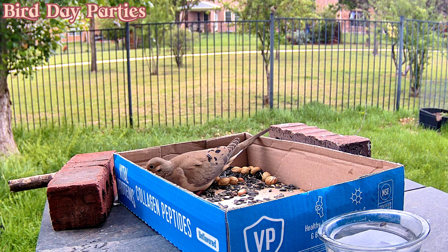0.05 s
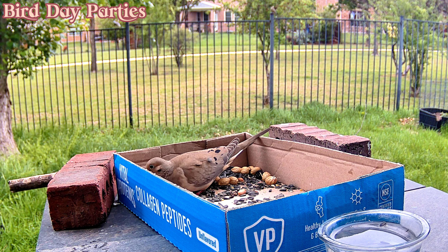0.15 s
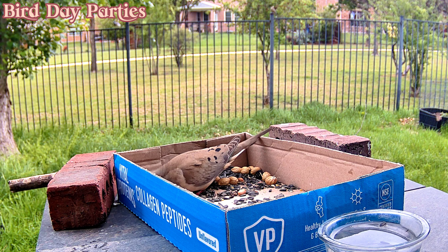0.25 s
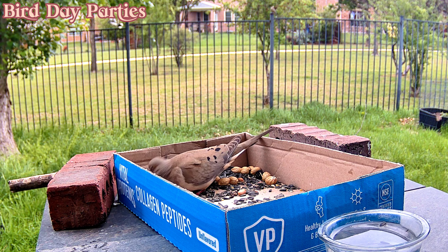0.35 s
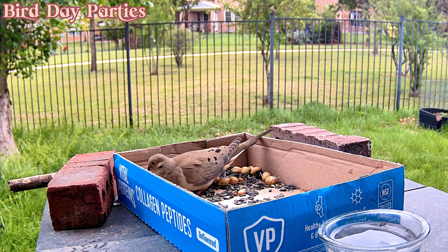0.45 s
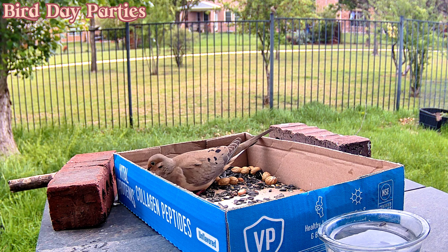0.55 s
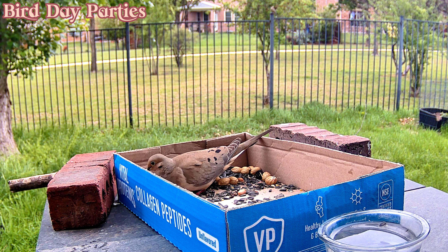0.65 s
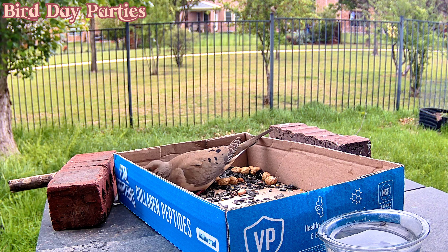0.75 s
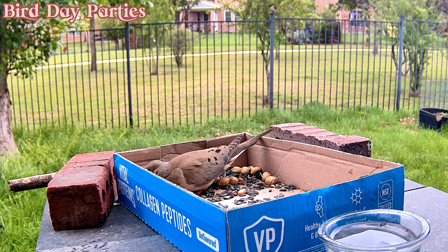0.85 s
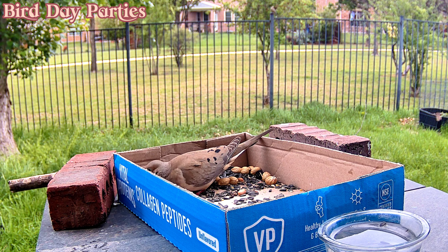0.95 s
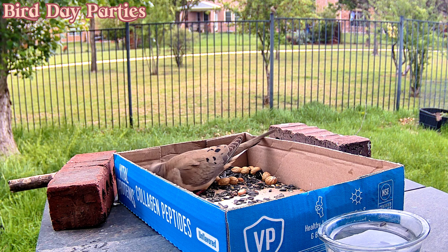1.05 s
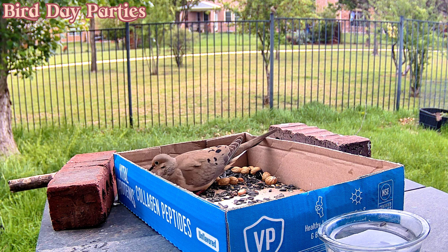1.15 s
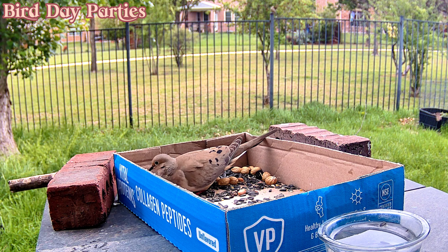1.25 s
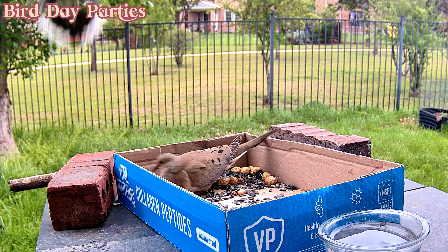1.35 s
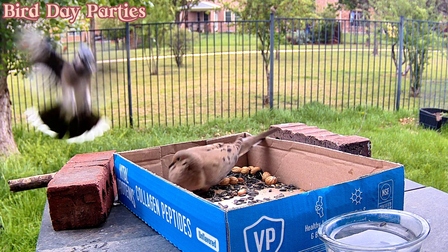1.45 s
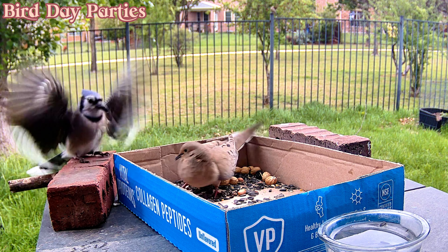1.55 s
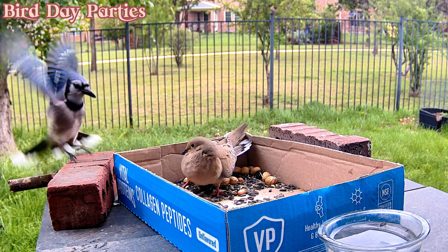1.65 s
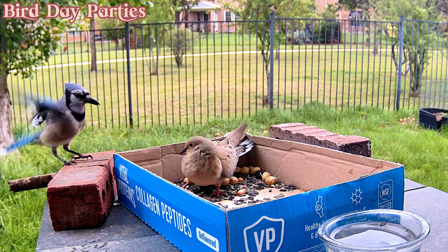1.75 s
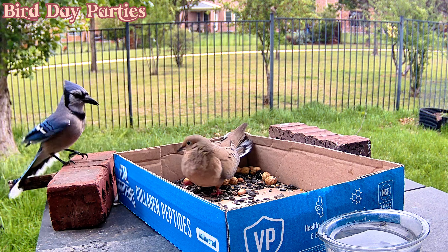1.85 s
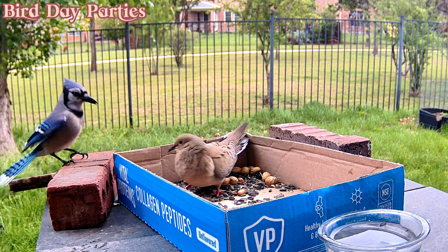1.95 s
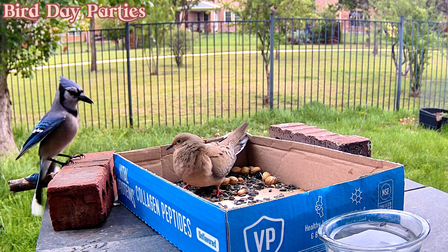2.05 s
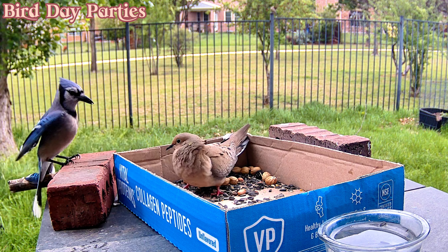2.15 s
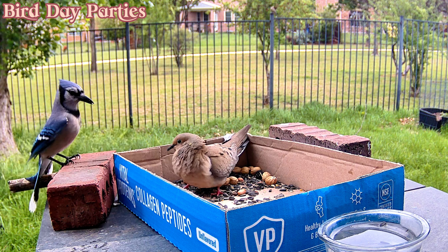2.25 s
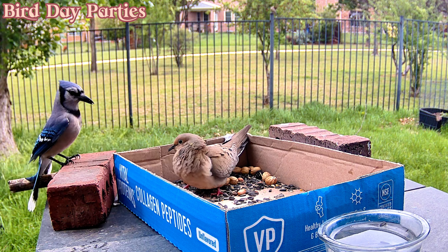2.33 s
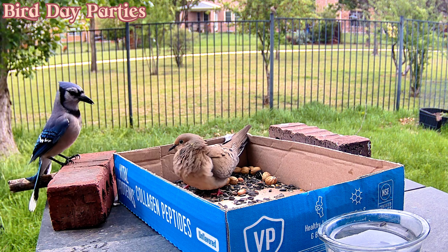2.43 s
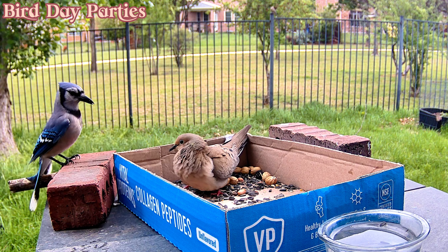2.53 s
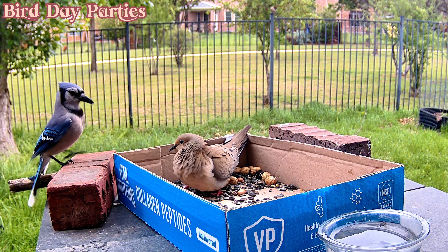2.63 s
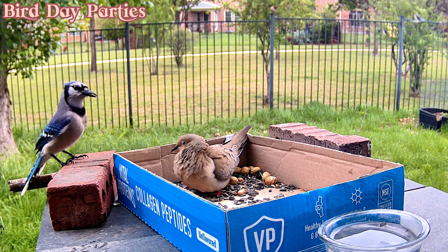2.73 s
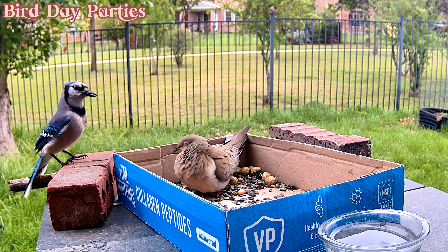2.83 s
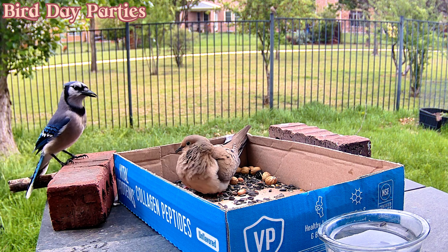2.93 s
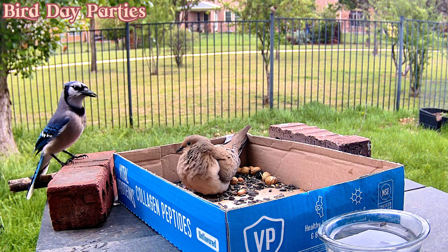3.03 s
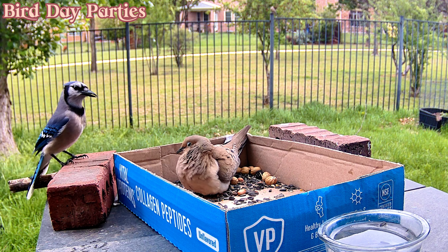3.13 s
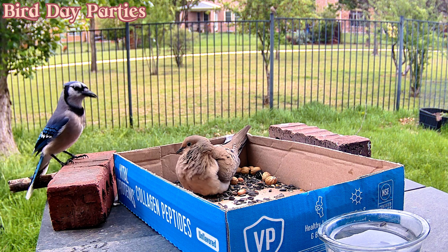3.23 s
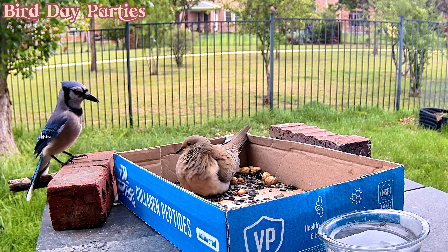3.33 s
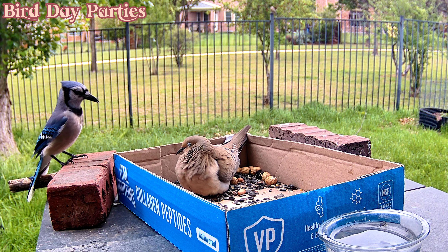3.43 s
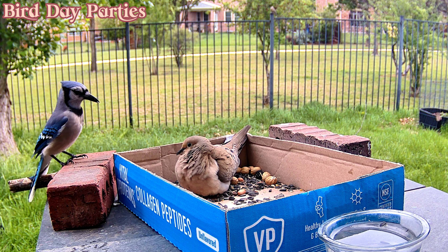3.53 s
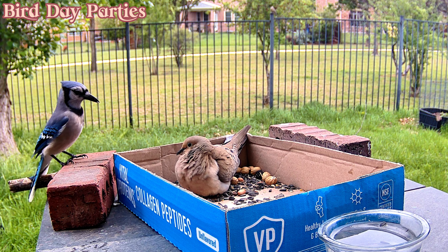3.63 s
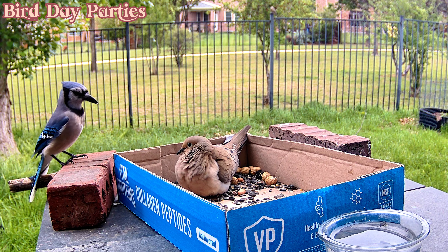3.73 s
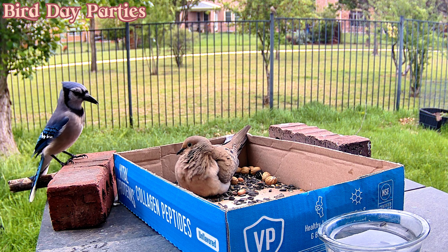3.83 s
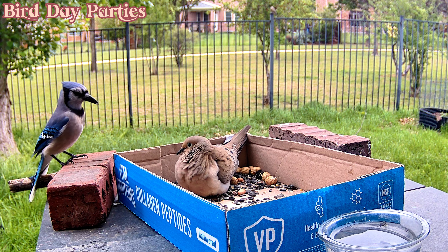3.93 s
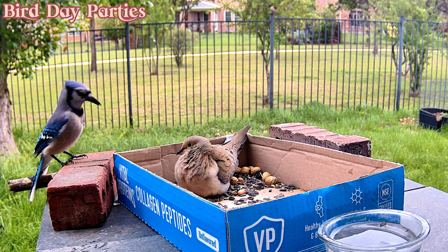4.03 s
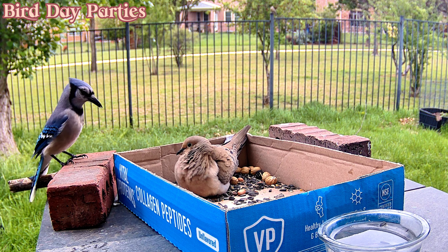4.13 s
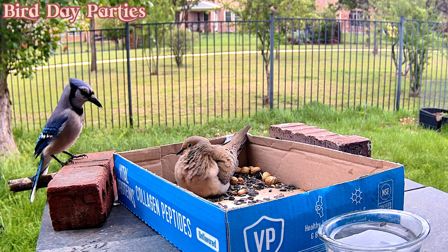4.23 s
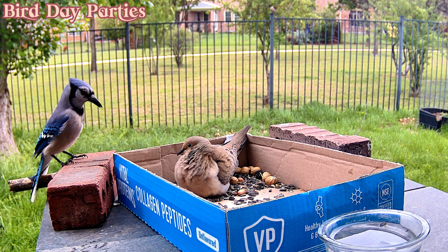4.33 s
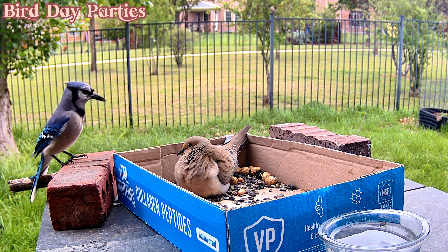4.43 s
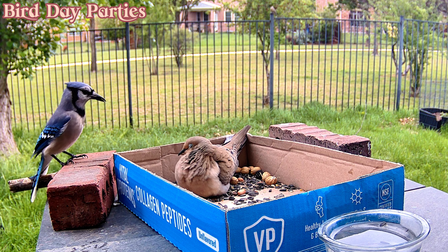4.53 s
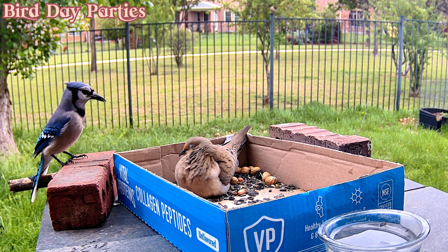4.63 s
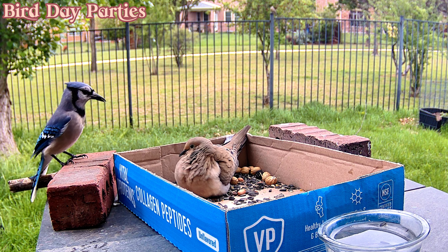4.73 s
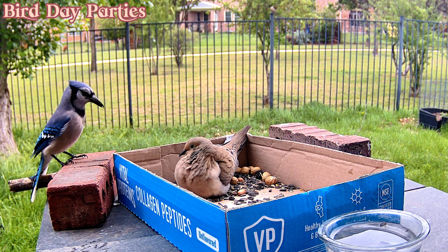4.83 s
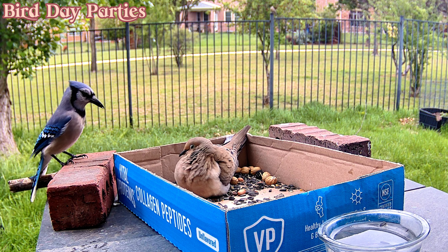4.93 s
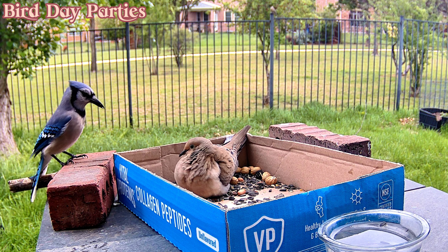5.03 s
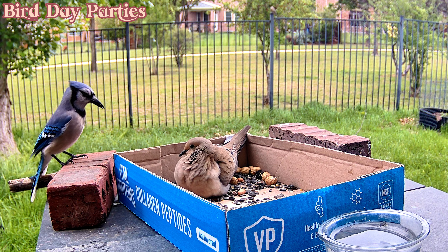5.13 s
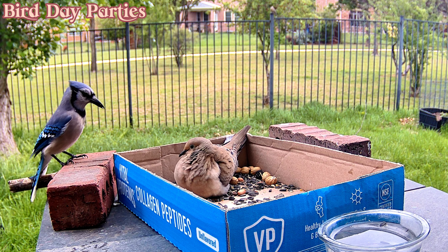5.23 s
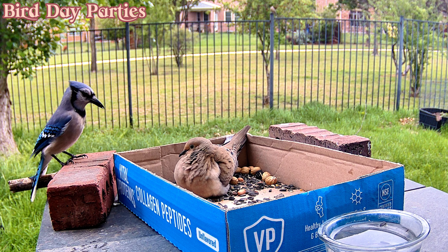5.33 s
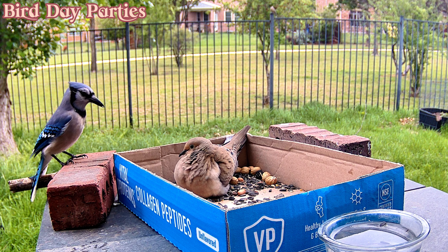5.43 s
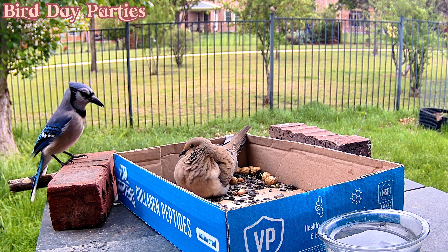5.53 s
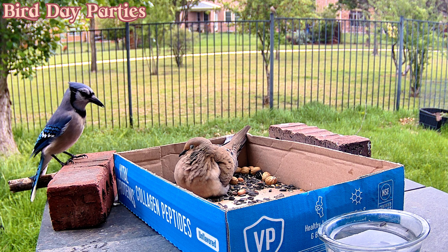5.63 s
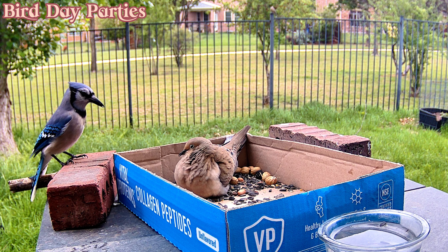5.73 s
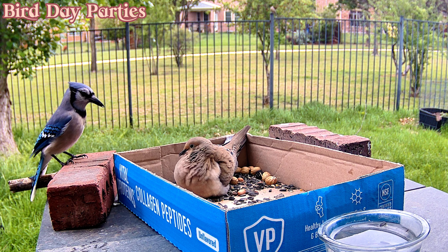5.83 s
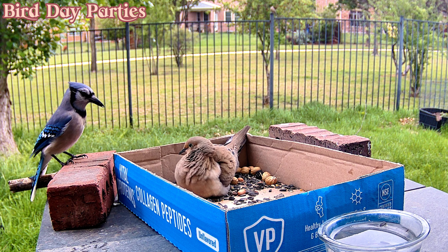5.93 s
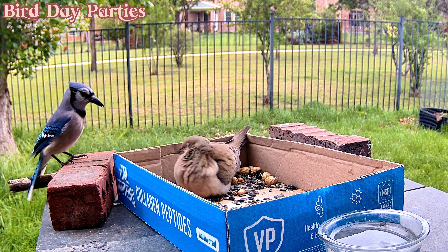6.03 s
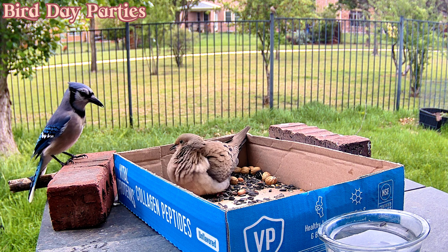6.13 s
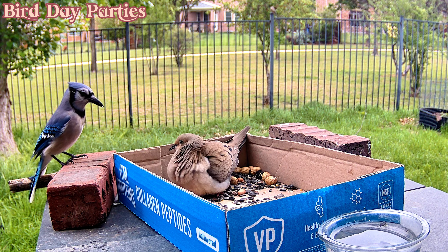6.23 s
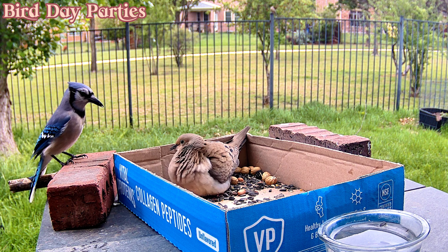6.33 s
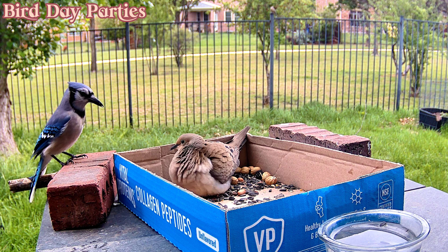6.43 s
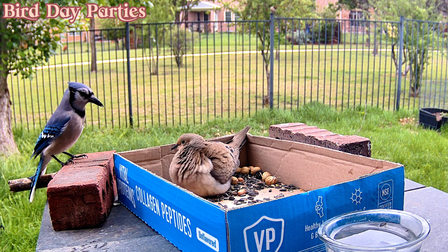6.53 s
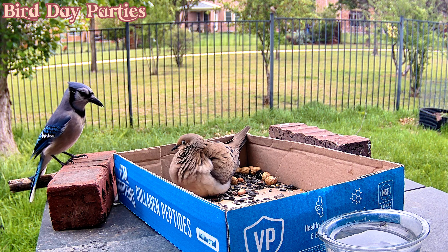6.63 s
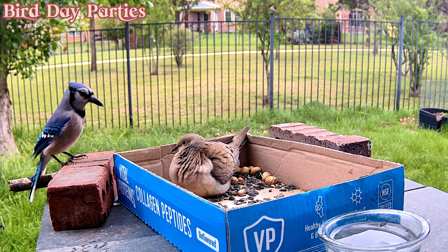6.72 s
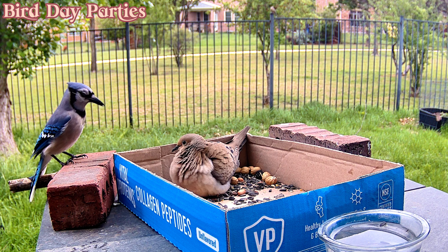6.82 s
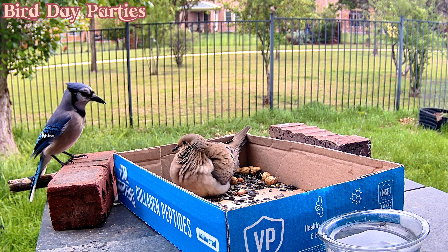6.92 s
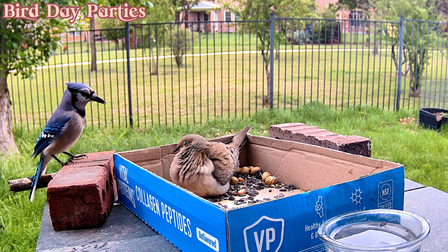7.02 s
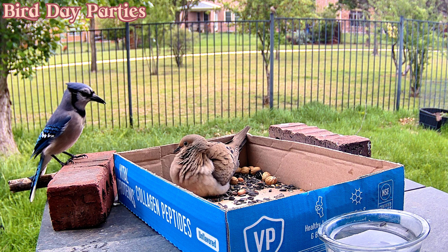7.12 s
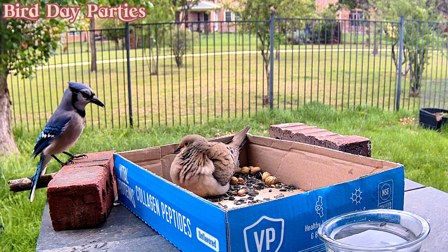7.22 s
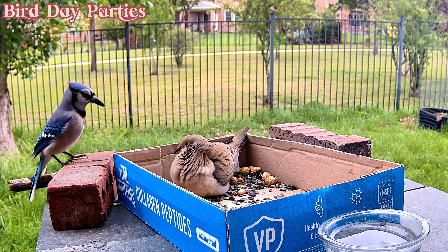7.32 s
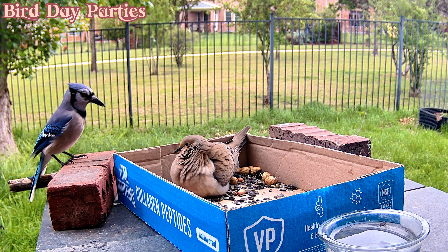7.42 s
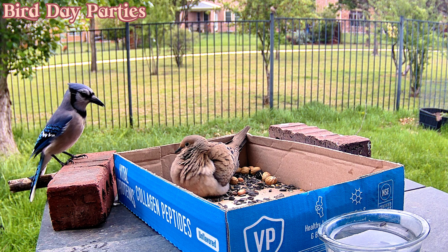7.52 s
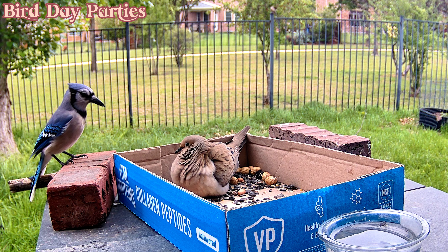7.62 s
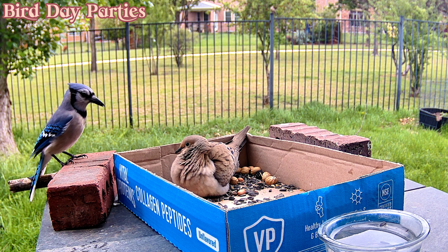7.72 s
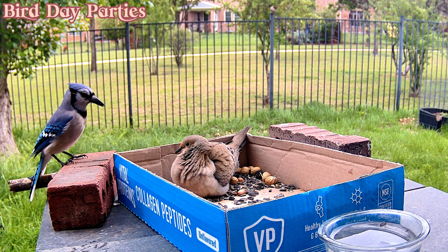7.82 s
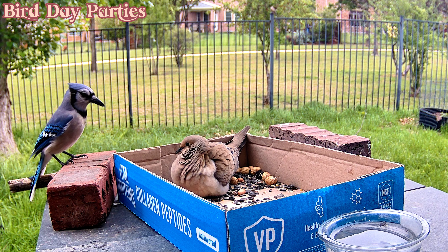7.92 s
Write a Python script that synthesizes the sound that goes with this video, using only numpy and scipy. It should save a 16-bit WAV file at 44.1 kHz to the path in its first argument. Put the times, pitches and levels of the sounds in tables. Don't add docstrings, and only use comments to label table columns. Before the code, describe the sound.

A backyard with soft traffic and leaf wash, steady thin crickets and a katydid pulsing about ten times a second in runs. Low wind eddies bump the microphone, strongest around 2 to 4 s; the treble is limited and briefly drops out. At 0 s a scratch tails off with light pecks and two throbbing bird notes. From 0.4 to 0.65 s a hard burst of pecks knocks the hollow cardboard and seeds slide; another follows at 1.15 to 1.45 s. Around 1.5 to 2.15 s claws scramble, with one sharp knock and dull booms near 1.7 s. The tray then quiets. Far pips sound at 2.1 to 2.6 s, husky sparrow chirps from 3 to 5 s and later, among faint high whistles. At 5.95 s the dove gives a short, low, gurgling grunt and shuffles. Falling songbird slurs with held pulses echo at 5.8, 6.5, 7.2 and 7.8 s.

```python
import sys
import numpy as np
from scipy import signal
from scipy.fft import rfft, irfft, next_fast_len
from scipy.io import wavfile
from scipy.ndimage import uniform_filter1d

SR = 44100
rng = np.random.default_rng(int(sys.argv[2]) if len(sys.argv) > 2 else 0)


def level_to_linear(level):
    exponent = np.asarray(level, float) / 20
    return 10 ** exponent


def pcm_store(signal):
    levels = np.round(np.clip(np.atleast_2d(signal), -1, 1) * 32767)
    wavfile.write(sys.argv[1], SR, levels.astype(np.int16).T)


N = 351477

# frequency in Hz, density in dB per Hz.
AIR_SPECTRUM = [(59, -30.5), (100, -24.5), (220, -16.5), (540, -20.5), (982, -23.5), (1460, -28),
                (1600, -27.5), (2860, -28), (3710, -32.5), (4160, -32), (4560, -29), (5300, -36),
                (7290, -30.5), (8790, -56), (11400, -83), (19300, -120)]
# time in seconds, level in dB.
LEAVES = [(0, 5), (1.1, 5), (2.4, 2.5), (3.001, 1.5), (5.999, 1.86), (7.97, 2)]
# centre in Hz, width in Hz, level in dB.
HUMS = [(1450, 46, -77), (975, 32, -76)]
# time in seconds, push in dB.
WIND_PUSH = [(0.0, -32), (0.8, -35.5), (1.9, -35), (2.4, -38.5), (2.8, -37), (3.77, -40), (3.97, -35),
             (4.3, -40), (4.9, -33), (5.3, -37.5), (7.3, -49.5), (7.97, -65)]
# time in seconds, level in dB.
FLUTTER = [(0, -51), (7.2, -55), (7.97, -49.5)]
# peak time in seconds, peak in dB, frequency in Hz.
PULLS = [(0.207, -21, 66.6), (0.261, -40, 44), (.29, -40, 55.6), (0.426, -29, 62), (0.696, -32.5, 59.3),
         (.98, -33, 45.3), (1.019, -30, 39), (1.405, -32, 64.5), (1.759, -22, 61), (1.931, -26, 49),
         (1.963, -16.5, 64), (1.998, -21, 61.6), (2.101, -29.5, 45.6), (2.441, -28, 50.3),
         (2.741, -10, 64.2), (2.872, -27, 59.6), (3.031, -33, 45.9), (3.9, -28.5, 49.8),
         (3.93, -18.5, 60.2), (3.979, -27, 55), (4.396, -25.5, 54.4), (5.189, -26, 60.2),
         (5.211, -17.5, 57.2), (5.286, -25.5, 50.7), (5.735, -27.5, 59.7), (6.118, -35.5, 45),
         (7.045, -40.5, 69.8), (7.958, -37, 61.7)]
# peak time in seconds, peak in dB, frequency in Hz.
PUSHES = [(.1, -32, 44.6), (1.09, -27, 50.8), (1.717, -29, 62), (1.907, -25.5, 112), (2.14, -31.5, 67),
          (2.172, -30, 71), (2.915, -33, 55.3), (3.385, -44, 55), (4.052, -39, 55.5), (4.097, -35, 47),
          (4.125, -38, 53.6), (4.959, -32.5, 49.8), (5.612, -23, 53.2), (6.354, -20, 69.4), (6.47, -34, 61)]
# start in seconds, rise in seconds, hold in seconds, level in dB,
# treble in dB against it.
SLIDES = [
    (0.0, 0.0012, 0.0019, -33.5, -4.5),
    (0.391, 0.027, 0.084, -29.5, -7),
    (1.149, 0.027, 0.073, -32, -5),
    (1.402, .01, 0.34, -53.5, -0.5),
    (1.595, 0.084, 0.0018, -32, -1.5),
    (1.726, 0.0086, 0.13, -44.5, -18),
    (1.9, 0.0072, 0.086, -59.5, 2),
    (2.037, 0.01, 0.0011, -37.5, -4),
    (2.065, 0.0077, 0.01, -50, 3),
    (6.083, 0.11, .002, -41, -0.5),
]
# frequency in Hz, density in dB per Hz.
SEED_SPECTRUM = [(150, -51), (250, -1.5), (299, -13.5), (403, -23.5), (620, -34.5), (999, -5), (1180, -12),
                 (1630, 0.5), (1980, -7.5), (2960, 1), (3540, -2), (6930, -2.5), (8790, -31.5),
                 (11400, -64), (19300, -120)]
# frequency in Hz, width in Hz, level in dB.
TRAY_MODES = [(632, 19, -2), (918, 380, -5), (1700, 28, -12), (1870, 92, -2), (2400, 38, -7),
              (2840, 60, -10), (3984, 160, -2)]
# loudest time in seconds, pitch in Hz, level in dB,
# throb period in seconds, fade in dB per second.
OPENING_NOTES = [
    (0.043, 2400, -27.5, 0.022, 103),
    (0.175, 1557, -29.5, 0.03, 334),
]
THROB_DB = (6.5, 2.5)
BEFORE_S = (0.05, .044)
AFTER_S = (0.033, .075)
# time in seconds, peak in dB, ring in Hz, seed tick in dB against the blow.
CONTACTS = [(0.038, -24, 1800, -11), (0.0772, -30, 2000, -7.5), (0.0835, -31, 2400, 0.5), (0.1, -27, 2590, -5),
            (0.1236, -36, 2770, -3), (0.4178, -13.5, 2000, -35), (0.497, -21, 1660, -10),
            (0.5025, -15.5, 1660, -18.5), (0.5188, -49, 1720, 4), (0.5328, -25, 1780, -1.5),
            (0.547, -26, 1870, -18), (0.5669, -26, 2410, 0.5), (0.5739, -24.5, 1700, -23),
            (0.5998, -36, 2250, 0.5), (0.636, -31, 1980, -5), (0.6572, -38, 1590, -8),
            (1.1717, -17.5, 2820, -21), (1.1901, -20, 1740, 0.5), (1.2075, -18, 1590, -29),
            (1.2256, -19.5, 1630, -25.5), (1.2437, -20.5, 1590, -17), (1.2567, -21.5, 1700, -14),
            (1.274, -36, 2700, -8.5), (1.29, -25, 1570, -37), (1.33, -29, 1510, -25.5),
            (1.3675, -16, 1640, -46), (1.4252, -33, 1390, -14),
            (1.485, -34.5, 1940, -2), (1.5066, -35.5, 3050, -13), (1.6004, -41, 4100, 4.5),
         (1.64, -21, 4260, -31), (1.6686, -28, 1780, -32), (1.694, -8.5, 2730, -41),
         (1.6989, -17, 2840, -5.5), (1.7486, -24.5, 2920, -5.5), (1.7975, -24, 1720, -17),
         (1.824, -31, 2960, -32), (1.849, -19.5, 3140, -42), (1.8663, -31, 1870, -29),
         (1.8996, -36, 3020, -34.5), (1.9242, -30.5, 2900, -18), (1.942, -40.5, 3100, -30),
         (2.0536, -17.5, 3180, -20.5), (2.0562, -19.5, 2060, -8), (6.1085, -34, 2085, -37.5),
         (6.1464, -38.5, 4100, -24.5), (6.1895, -25.5, 2990, -32), (6.194, -24, 1235, -34.5),
         (6.217, -36, 3100, -19), (6.248, -44, 1800, 10.5), (6.2567, -50, 4090, 5.5),
            (0.415, -19.5, 2840, -34), (0.4221, -23, 1210, -32), (0.429, -23, 2700, -33),
          (.44, -24, 2200, -30), (.446, -22, 2740, -32), (0.452, -30, 2560, -30), (0.459, -18, 1620, -29),
          (0.464, -15.5, 1500, -30), (0.472, -21.5, 1500, -27), (0.477, -21, 2950, -40),
          (0.5174, -33, 1600, -20), (.539, -21, 1560, -8.5), (0.583, -39, 3820, 3.5),
          (1.178, -21.5, 1700, -16), (1.187, -32, 1700, -21), (1.194, -29, 1700, -14),
          (1.2043, -20.5, 2750, -1.5), (1.216, -31, 1700, -2), (1.238, -25, 1600, -17),
          (1.28, -29, 2820, -4), (1.299, -32, 1460, -14.5), (6.115, -34.5, 2800, -34),
          (6.12, -39, 1900, -31), (6.178, -48, 2850, -23), (0.017, -35, 1900, -28), (0.051, -33, 3000, -18),
          (0.131, -38, 3000, -17.5), (.158, -37, 2870, -24), (1.7523, -26, 2760, 2.5),
          (1.794, -31.5, 3000, 2), (2.066, -27, 3040, -32), (2.145, -41, 3650, -12)]
# first time in seconds, last time in seconds, level in dB,
# first ring in Hz, last ring in Hz.
SKIDS = [
    (1.991, 2.008, -47, 1660, 1620),
    (2.096, 2.125, -41, 3400, 2260),
]
# start in seconds, length in seconds, first pitch in Hz, last pitch in Hz, level in dB.
SEETS = [(0.03, .33, 7300, 6920, -65), (0.629, 0.32, 6780, 6755, -55), (0.834, 0.31, 7170, 7225, -62),
         (1.474, 0.14, 7250, 7160, -60.5), (2.515, 0.09, 7000, 7140, -86), (3.194, 0.22, 7320, 6920, -71),
         (3.535, 0.46, 7260, 7500, -71.5), (4.052, 0.16, 7140, 7290, -69.5), (4.498, 0.23, 6430, 7500, -71),
         (4.681, 0.11, 6950, 7140, -70), (4.896, .27, 7180, 7180, -69), (6.86, 0.56, 7050, 7000, -73.5),
         (7.242, 0.11, 7080, 6900, -72.5), (7.583, 0.25, 7170, 7010, -65.5)]
# time in seconds, pitch in Hz, level in dB.
SLURS = [
    [(5.8, 4036, -78), (5.808, 3860, -72), (5.836, 3488, -48.5), (5.85, 3357, -58), (5.874, 3168, -50),
     (5.884, 3081, -49.5), (5.9, 2966, -74)],
    [(6.505, 6300, -80), (6.517, 5831, -52), (6.543, 4768, -59), (6.553, 4645, -82), (6.569, 4218, -49.5),
     (6.615, 3637, -49.5), (6.627, 3492, -41), (6.687, 2822, -53.5), (6.692, 2788, -62)],
    [(7.165, 6960, -66), (7.173, 6472, -58), (7.193, 5010, -67), (7.221, 4277, -51), (7.259, 3695, -50),
     (7.273, 3472, -39), (7.299, 3103, -56), (7.311, 3088, -50), (7.335, 2746, -61)],
    [(7.79, 5594, -61), (7.81, 4717, -65), (7.824, 4363, -57), (7.85, 4005, -57.5), (7.878, 3495, -42),
     (7.892, 3338, -42.5), (7.93, 2962, -53), (7.935, 2941, -61)],
]
# first pulse in seconds, level in dB, second pulse in dB against it,
# gap in seconds, tail in seconds.
HOLDS = [
    (5.936, -54, -9, .08, 0.077),
    (6.72, -44.5, -1.5, .068, .12),
    (7.36, -45.5, -2, .065, .085),
    (7.972, -55, -2, .065, .02),
]
# frequency in Hz, level in dB.
FENCE_ECHO = [(2000, -4), (2450, -9), (3000, -9), (4400, 2), (5600, -6.5)]
# first stroke in seconds, last stroke in seconds,
# lateness of every other stroke in seconds.
KATYDID_RUNS = [(.191, .315, 0), (.705, 1.108, -.008), (2.217, 2.319, 0), (2.397, 3.213, .011),
                (3.37, 3.471, 0), (3.605, 3.796, .012), (4.009, 4.1, 0), (4.248, 4.477, 0),
                (4.578, 5.565, 0), (5.686, 5.982, 0), (6.311, 7.92, 0)]
# time in seconds, level in dB, frequency in Hz.
THUDS = [
    (.46, -28, 666),
    (0.52, -36, 205),
    (2.1, -41.5, 280),
    (1.68, -32.5, 120),
    (1.733, -31, 295),
]
# start in seconds, body in dB, hook in dB, pitch as a multiple of the usual.
CHIRPS = [(0.832, -59, -59, 0.91), (1.05, -56, -60, 1.001), (3.02, -63, -68, 0.97), (3.164, -49, -56, 1),
          (3.386, -52, -53.5, 0.99), (4.024, -53.5, -57.5, 1.01), (4.255, -53, -58, 0.99),
          (4.702, -53, -61, 0.99), (4.928, -51.5, -59.5, 1.001), (6.285, -58, -80.5, 0.94),
          (7.155, -52.5, -63, 1.05), (7.405, -52.5, -60, 1.08)]
# time in seconds, pitch in Hz, level in dB.
CHIRP_HOOK = [(0, 3270, -9.5), (.012, 3100, -14.5), (.03, 3330, -5.5), (.042, 2700, -8)]
# time in seconds, pitch in Hz, level in dB.
CHIRP_BODY = [(.008, 2614, -15), (.022, 2540, -16), (.036, 2748, -6), (.046, 2559, -9.5), (.058, 2632, -2),
              (.075, 2783, -13.5), (.13, 2668, -22.5)]
# start in seconds, length in seconds, first pitch in Hz,
# last pitch in Hz, level in dB.
PIPS = [(2.106, 0.017, 2387, 2330, -53), (2.116, 0.013, 2330, 2325, -54), (2.144, .012, 2400, 2380, -60),
        (2.171, .02, 2762, 2748, -61), (2.2, .016, 2714, 2696, -62), (2.236, 0.032, 2750, 2536, -57.5),
        (2.339, .012, 2660, 2670, -56.5), (2.374, 0.036, 2790, 2560, -61), (2.475, 0.0278, 2760, 2610, -67),
        (2.591, 0.021, 2680, 2645, -66.5), (2.62, 0.032, 2740, 2543, -62),
        (6.328, 0.028, 2640, 2640, -55.5)]
# time in seconds, effort in dB, throat pitch in Hz.
GRUNT = [(5.93, -60, 488), (5.945, -50, 470), (5.962, -46, 463), (5.985, -38, 464), (6.036, -38.5, 478),
         (6.066, -42, 482), (6.096, -45, 480), (6.102, -55, 500), (6.13, -61, 505)]
# multiple of the throat pitch, width in Hz, level in dB.
CROP = [(1.0, 70, -11), (.8, 60, -15), (1.16, 70, -11), (1.36, 80, -10), (1.75, 120, -19), (2.15, 120, -22)]
# time in seconds, beats per second, depth from 0 to 1.
GURGLE = [(5.93, 45, .3), (5.98, 48, .15), (6.003, 50, .5), (6.022, 50, .35), (6.045, 66, .5),
          (6.065, 78, .65), (6.1, 80, .85), (6.13, 85, .5)]
# frequency in Hz, level in dB.
MIRROR_SPECTRUM = [(7980, -73.5), (8060, -3.5), (8400, -12.5), (8870, -30), (9200, -32.5), (9500, -89)]
LOST_BLOCKS = [-1, 5, 6, 17, 20, 25, 28, 31, 42, 60, 94, 95, 96, 122]


def evened(x):
    return x / np.sqrt(np.mean(x ** 2) + 1e-20)


def add(mix, s, sound):
    part = mix[max(round(s * SR), 0):][:len(sound)]
    part += sound[:len(part)]


def coloured(x, points):
    f, db = np.transpose(points)
    size = next_fast_len(len(x))
    hz = np.fft.rfftfreq(size, 1 / SR)
    gain = level_to_linear(np.interp(np.log(hz + 1), np.log(f + 1), db))
    return irfft(rfft(x, size) * gain, size)[:len(x)]


def band(x, lo_hz, hi_hz, order=2):
    return signal.sosfilt(signal.butter(order, [lo_hz, hi_hz], "bandpass", fs=SR, output="sos"), x)


def resonate(x, hz, width):
    turn = np.exp(2j * np.pi * np.cumsum(hz * np.ones(len(x))) / SR)
    r = np.exp(-np.pi * width / SR)
    return 2 * (turn * signal.lfilter([1 - r], [1, -r], x / turn + 1e-18)).real


def narrow_noise(hz, width):
    return evened(resonate(resonate(rng.standard_normal(N), hz, width), hz, width))


def sine(hz):
    return np.sqrt(2) * np.sin(2 * np.pi * np.cumsum(hz) / SR)


def unfold(rows):
    s, *columns = np.transpose(rows)
    t = np.arange(s[0], s[-1], 1 / SR)
    return s[0], *(np.interp(t, s, c) for c in columns)


def whistles(calls, husk, width, fraying=0):
    hz, size = np.full(N, 3000.), np.zeros(N)
    for rows in calls:
        s, pitch, db = unfold(rows)
        at = slice(round(s * SR), round(s * SR) + len(db))
        room = len(hz[at])
        hz[at], size[at] = pitch[:room], level_to_linear(db)[:room]
    pure = sine(hz)
    breath = narrow_noise(hz, width)
    husk = np.clip(husk * (size.max() / (size + 1e-9)) ** fraying, 0, 1)
    return uniform_filter1d(size, 150) * ((1 - husk) * pure + husk * breath)


def glide(s, length, first_hz, last_hz, db):
    u = np.linspace(0, 1, 9)
    return np.transpose([s + length * u, first_hz + (last_hz - first_hz) * u, db - 5 * (2 * u - 1) ** 2])


def yard(x, t60):
    t = np.arange(SR // 2) / SR
    tail = rng.standard_normal(len(t)) * (rng.random(len(t)) < .3) * level_to_linear(-60 * t / t60) * (t > .006)
    return signal.oaconvolve(x, tail / np.linalg.norm(tail))[:N]


def air():
    hiss = coloured(rng.standard_normal(N), AIR_SPECTRUM)
    hiss = hiss / band(hiss, 190, 6000, order=4).std()
    breeze_db = np.interp(np.arange(N) / SR, *np.transpose(LEAVES))
    machines = sum(level_to_linear(db) * evened(resonate(rng.standard_normal(N), hz, width)) for hz, width, db in HUMS)
    return level_to_linear(breeze_db - 65) * hiss + machines


def wind():
    t = np.arange(N) / SR
    push, flutter, lumps = rng.standard_normal((3, N))
    lumps = level_to_linear(np.minimum(4.07 * evened(band(lumps, 2.03, 10.6)) * .7, 4.5))
    pressure = level_to_linear(np.interp(t, *np.transpose(WIND_PUSH))) * evened(band(push, 6.73, 23.0))
    wake = level_to_linear(np.interp(t, *np.transpose(FLUTTER)))
    for s, db, _ in PULLS + PUSHES:
        wake = wake + level_to_linear(db - 23) * np.exp(-abs(t - s) / 0.024)
    out = lumps * (pressure + wake * evened(band(flutter, 49.0, 103.2)))
    rush = evened(band(flutter, 120, 230))
    for way, s, db, hz in [(-1, *row) for row in PULLS] + [(1, *row) for row in PUSHES]:
        u = np.arange(-1.8, 1.8, hz / SR)
        eddy = np.exp(-((u - .1) / 0.67) ** 2) * np.cos(2 * np.pi * (u - 0.083 * u ** 2))
        snap = np.exp(-(u / 0.41) ** 2) * np.sin(2 * np.pi * 2.08 * u)
        swirl = 0.04 * np.exp(-(u / 0.55) ** 2) * rush[round(s * SR / 2):][:len(u)]
        add(out, s + u[0] / hz, way * level_to_linear(db) * (eddy + 0.2 * snap + swirl))
    return out


def slide_curve(start, rise, hold, db):
    top = start + rise
    settle_s, settle_db_per_s = .22, 150
    return [(start, db - 25), (top, db), (top + hold, db),
            (top + hold + settle_s, db - settle_db_per_s * settle_s)]


def sliding_seeds():
    out = np.zeros(N)
    size = level_to_linear(2.25 * np.minimum(rng.exponential(1, N), 3.5)) * (rng.random(N) < 2400 / SR)
    patter = coloured(size * rng.standard_normal(N), SEED_SPECTRUM)
    ringing = sum(level_to_linear(db) * resonate(patter, hz, width) for hz, width, db in TRAY_MODES)
    low = evened(band(evened(patter) + 0.66 * evened(ringing), 130, 2800))
    high = evened(band(patter, 5150, 8000))
    for *shape, treble_db in SLIDES:
        s, db = unfold(slide_curve(*shape))
        at = slice(round(s * SR), round(s * SR) + len(db))
        add(out, s, level_to_linear(db - 8.0) * (low[at] + level_to_linear(treble_db) * high[at]))
    return out


def throb(note, depth_db, before, after):
    s, hz, db, period, fade = note
    t = np.arange(-before, after, .002)
    level_db = db - fade * abs(t) + depth_db * (np.cos(2 * np.pi * t / period) - 1)
    return np.transpose([np.maximum(s + t, 0), hz + 0 * t, level_db])


def nearer_bird():
    return whistles(map(throb, OPENING_NOTES, THROB_DB, BEFORE_S, AFTER_S), 0.24, 100)


def contact_sound(ring_hz, tick_db, chance, lead_s):
    t = np.arange(len(chance)) / SR - lead_s
    swell = 0.12 * np.exp(np.minimum(t, 0) / 0.004)
    strike = level_to_linear(-60 * t / 0.018) + 1.1 * np.exp(-abs(t) / 0.0005)
    contact = chance * np.where(t < 0, swell, strike)
    patch = evened(resonate(resonate(contact, ring_hz, 480), ring_hz, 2000))
    tray = evened(sum(level_to_linear(db) * resonate(contact, hz, 1.13 * width) for hz, width, db in TRAY_MODES))
    scrape = evened(band(contact, 1050, 4870, order=3))
    blow = band(patch + .5 * tray + .5 * scrape, 340, 3470)
    tick = band(contact, 4740, 7070, order=4)
    return blow / abs(blow).max() + level_to_linear(tick_db) * tick / abs(tick).max()


def skid(first, last, db, first_hz, last_hz):
    u = np.linspace(0, 1, round((last - first) / 0.0024) + 1)
    late, hard = rng.standard_normal((len(u), 2)).T
    s = first + (last - first) * u + 0.0017 * late
    ring_hz = first_hz + (last_hz - first_hz) * u
    return [(at, level, hz, 5) for at, level, hz in zip(s, db + 4 * hard, ring_hz)]


def beak_and_claws():
    out, lead_s = np.zeros(N), .01
    blows = CONTACTS
    for row in SKIDS:
        blows = blows + skid(*row)
    for (s, db, *colour), chance in zip(blows, rng.standard_normal((len(blows), 2000))):
        add(out, s - lead_s, level_to_linear(db) * contact_sound(*colour, chance, lead_s))
    return out


def hold_curve(s, db, second_db, gap, tail):
    u = np.arange(-.026, gap + tail, .002)
    late = u - gap
    first, second = (-720 * np.maximum(abs(v) - .008, 0) for v in (u, late))
    tail_db = np.where(late > 0, -4 - 131 * late, -30)
    level_db = np.max([first, second_db + second, tail_db], axis=0)
    hz = 2410 - 6000 * np.maximum(late - .008, 0)
    return np.transpose([s + u, hz, db + level_db])


def songbirds():
    seets = [glide(*row) for row in SEETS]
    clear, faint = seets[1:3], seets[:1] + seets[3:]
    fraying = .3
    flicker = evened(band(rng.standard_normal(N), 30, 57))
    song = whistles(SLURS, 0.22, 230, fraying) + whistles(clear, 0.16, 55) + whistles(faint, 0.89, 300)
    held = whistles([hold_curve(*row) for row in HOLDS], .07, 200, 3 * fraying)
    return level_to_linear(2.2 * flicker) * song + level_to_linear(.8 * flicker) * held


def insects():
    t = np.arange(-.02, .016, 1 / SR)
    opening = np.exp(-((t + 0.0059) / np.where(t < -.006, .008, .004)) ** 2)
    closing = np.exp(-((t - .007) / 0.0055) ** 2)
    gate, stroke_s = np.zeros(N), .1015
    for first, last, limp in KATYDID_RUNS:
        s = np.linspace(first, last, round((last - first) / stroke_s) + 1)
        s_limping = s + limp * (np.arange(len(s)) % 2)
        for at, db in zip(s_limping, 0.92 * rng.standard_normal(len(s))):
            add(gate, at - .02, level_to_linear(db) * (opening + closing))
    rasp = evened(band(rng.standard_normal(N), 5860, 6930))
    waver = evened(band(rng.standard_normal(N), 1.3, 44))
    nearest_cricket = sine(4426 + 6.7 * waver)
    other_crickets = narrow_noise(4426, 74)
    return level_to_linear(-63.5) * gate * rasp + level_to_linear(-68.0) * nearest_cricket + level_to_linear(-77.5) * other_crickets


def thuds():
    out, t, width = np.zeros(N), np.arange(0, .15, 1 / SR), 100
    for (s, db, hz), chance in zip(THUDS, rng.standard_normal((len(THUDS), len(t)))):
        boom = evened(resonate(resonate(chance, hz, width), hz, 2 * width))
        add(out, s, np.minimum(t / 0.0074, 1) * level_to_linear(db - 60 * t / 0.093) * boom)
    return out


def sparrows():
    stretch = 1 + (.1, .008, 0) * rng.standard_normal((len(CHIRPS), 3))
    hooks = [CHIRP_HOOK * k + (s, 0, db) for (s, _, db, _), k in zip(CHIRPS, stretch)]
    bodies = [CHIRP_BODY * k * (1, up, 1) + (s, 0, db) for (s, db, _, up), k in zip(CHIRPS, stretch)]
    pips = [glide(*row) for row in PIPS]
    return whistles(hooks, 0.4, 220) + whistles(bodies, 0.5, 380) + whistles(pips, 0.29, 200)


def grunt():
    s, db, hz = unfold(GRUNT)
    _, rate, depth = unfold(GURGLE)
    puffs, sway, shake = rng.standard_normal((3, len(hz)))
    breath = sum(level_to_linear(mode_db) * evened(resonate(resonate(puffs, k * hz, width), k * hz, 2 * width))
                 for k, width, mode_db in CROP)
    catch_db = 13 * np.exp(-np.arange(len(hz)) / SR / .035)
    breath = band(breath, 250, 1100, order=5) * level_to_linear(catch_db)
    tone = sine(hz + 8 * evened(band(sway, 12, 47)))
    beats = 1 - depth * np.cos(2 * np.pi * (np.cumsum(rate) / SR + .56))
    roughness = level_to_linear(1.3 * evened(band(shake, 30, 97)))
    out = np.zeros(N)
    add(out, s, level_to_linear(db) * (tone * beats * roughness + breath))
    return out


def scene():
    song, chirps, opening = songbirds(), sparrows(), nearer_bird()
    near = sliding_seeds() + beak_and_claws() + grunt() + thuds()
    mix = song + level_to_linear(-2.0) * yard(coloured(song, FENCE_ECHO), 0.32)
    mix += chirps + level_to_linear(-3.5) * yard(chirps, 0.2)
    mix += opening + level_to_linear(-14) * yard(opening, 0.2)
    mix += near + level_to_linear(-10.5) * yard(near, 0.054)
    return (mix + insects() + wind() + air())[None]


def lowpassed(x, hz):
    return signal.oaconvolve(x, signal.firwin(801, hz, window=("kaiser", 9), fs=SR)[None], "same")


def roll_off(x):
    return signal.sosfilt(signal.butter(12, 8940, fs=SR, output="sos"), x)


def record(dry):
    fold_hz, t = 8000, np.arange(N) / SR
    below = lowpassed(dry, fold_hz - 60)
    mirrored = 2 * below[0] * np.cos(2 * np.pi * 2 * fold_hz * t)
    dry = below + coloured(mirrored, MIRROR_SPECTRUM)
    block_s, first_s, overlap_s = .064, .0387, .007
    block = (t - first_s) / block_s
    lost_now = np.isin(np.floor(block), LOST_BLOCKS)
    lost = lost_now & np.isin(np.floor(block + overlap_s / block_s), LOST_BLOCKS)
    low = lowpassed(dry, 4620)
    top = signal.sosfiltfilt(signal.butter(8, 7650, "highpass", fs=SR, output="sos"), dry)
    refill = level_to_linear(3.2 * rng.standard_normal(int(block[-1]) + 2) + 1.0)[np.floor(block).astype(int) + 1]
    high = dry - low + top * (uniform_filter1d(refill, 80) - 1)
    kept = low + high * uniform_filter1d(1. - lost, 80)
    return roll_off(kept)


dry = scene()
out = record(dry)
pcm_store(out)
```